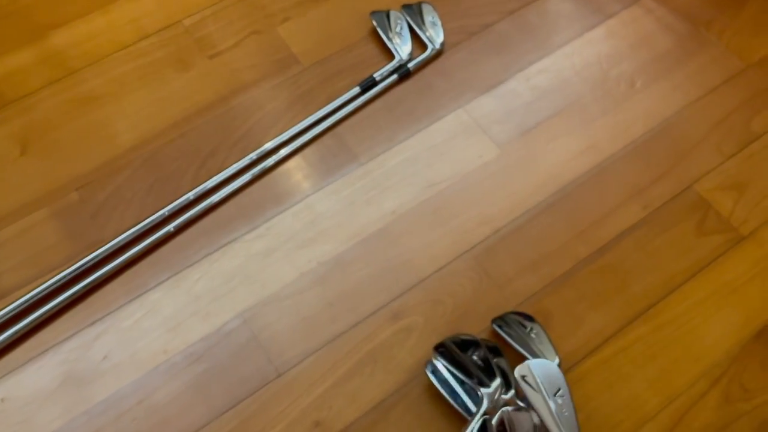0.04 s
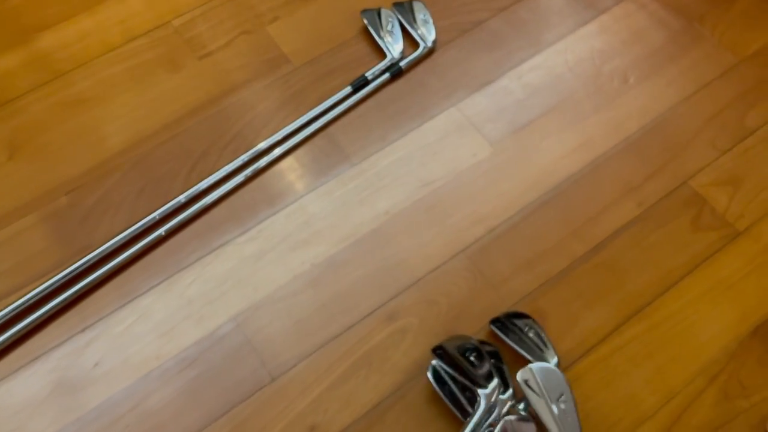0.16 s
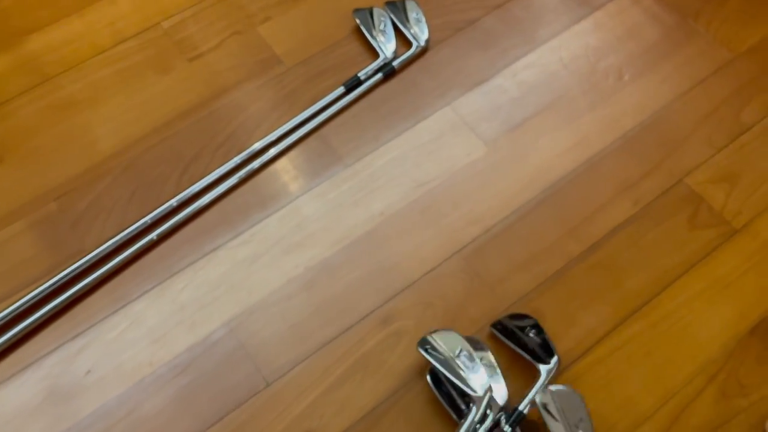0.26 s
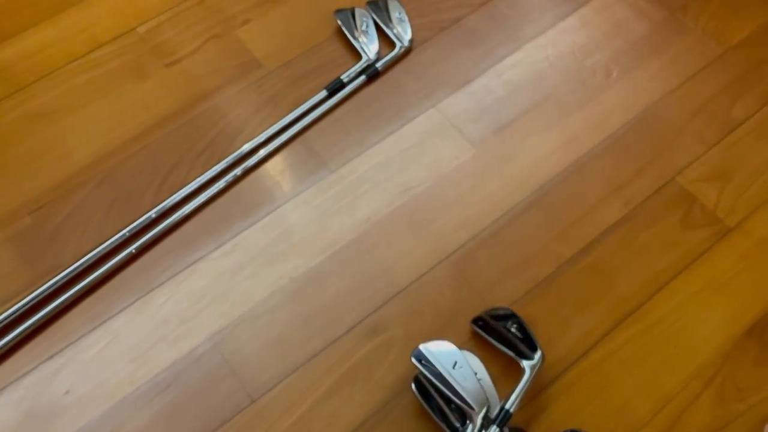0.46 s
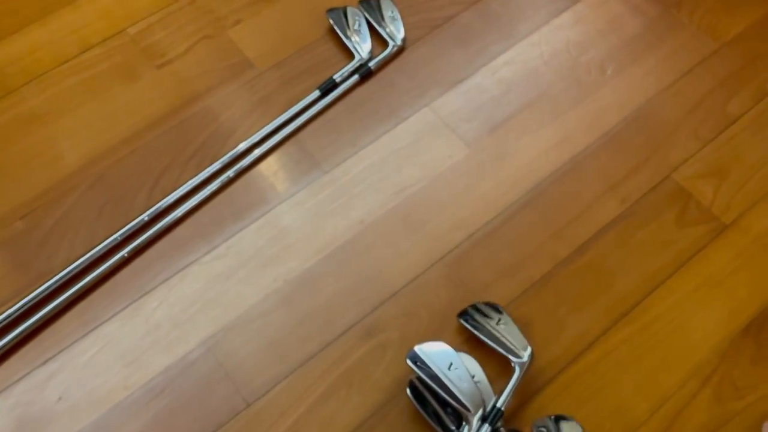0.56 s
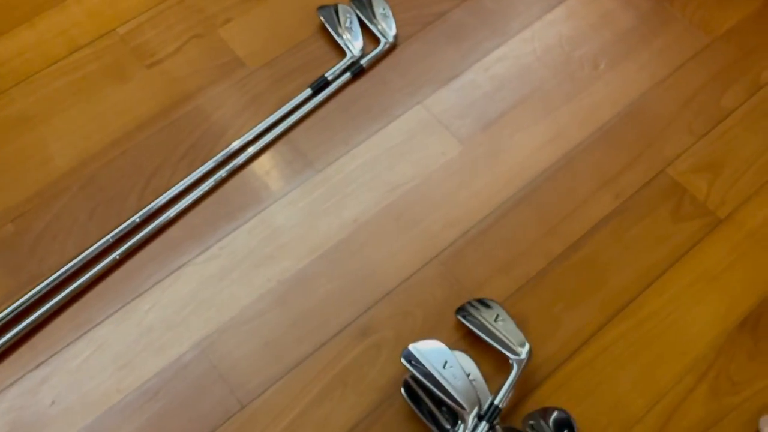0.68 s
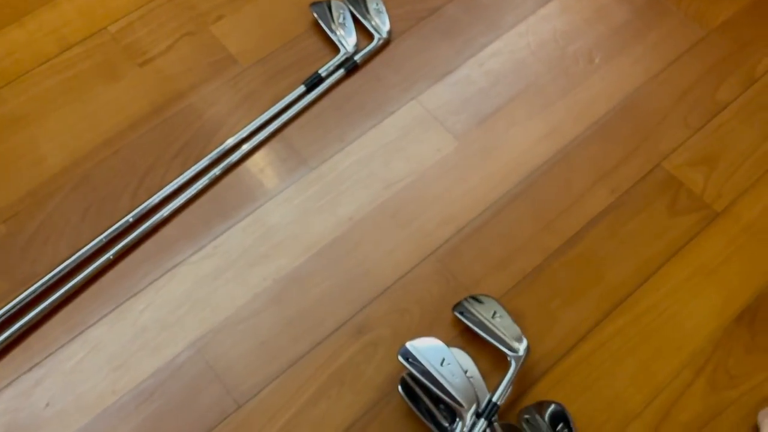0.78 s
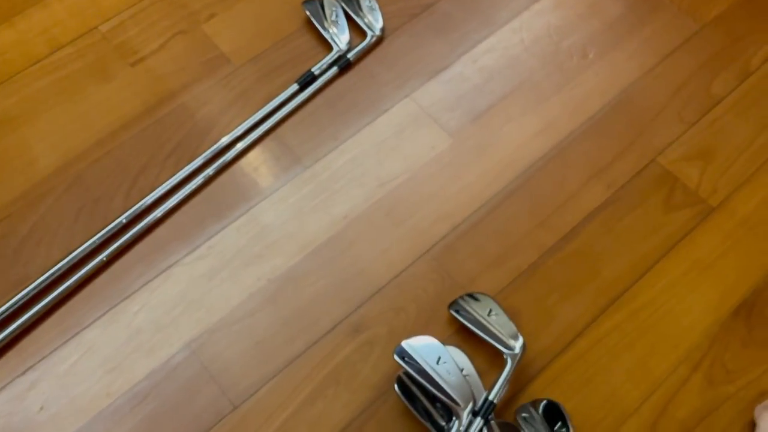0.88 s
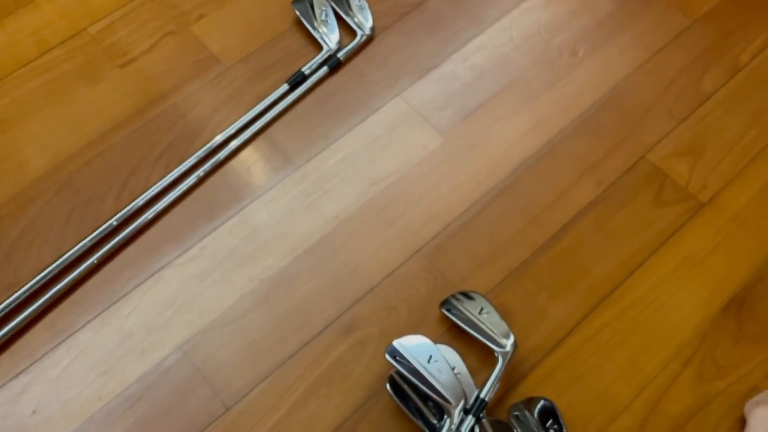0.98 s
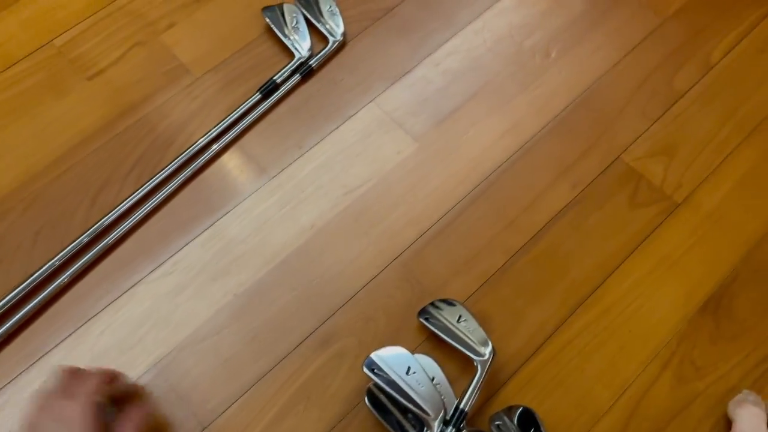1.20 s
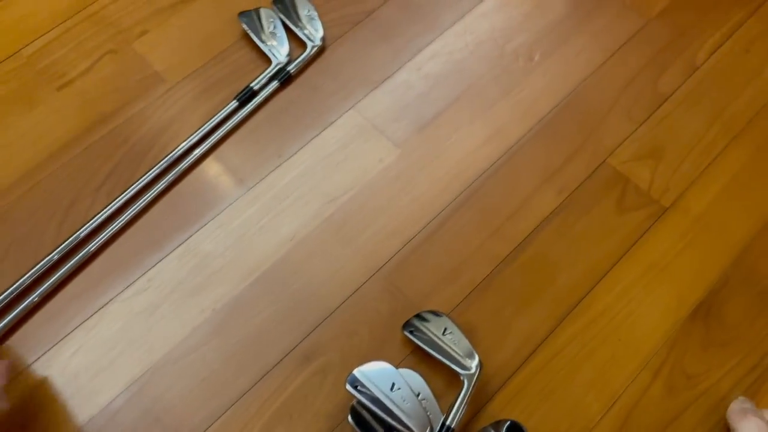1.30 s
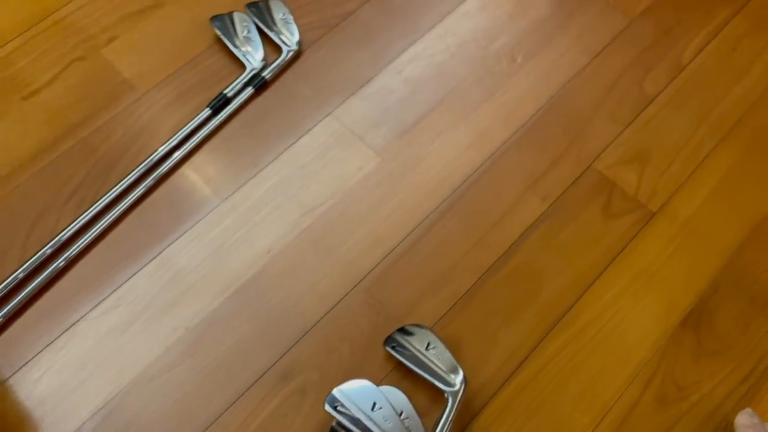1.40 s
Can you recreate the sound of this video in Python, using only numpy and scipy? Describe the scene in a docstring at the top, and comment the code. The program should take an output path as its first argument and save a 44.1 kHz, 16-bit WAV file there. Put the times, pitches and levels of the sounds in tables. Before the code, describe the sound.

A bundle of golf irons is set down hard: bright metal clacks, rattling shafts and hollow board knocks in a quick burst, echoing indoors, followed by sparse quiet clicks and dull handling bumps close to the microphone.

```python
"""An earlier blow still rings in a bare room, with faint hiss and low rumble; then light steel touches.
At 0.2-0.4 s a bundle of steel golf irons lands on a wooden floor: heads clack, boards knock, shafts rattle.
Blows excite decaying modes; tails of noise make the room. From 0.5 s come smaller ticks and knocks, and
soft low bumps at the hand-held microphone. Rumble and hiss are coloured noise under level curves.
Two microphone ports give left and right."""
import sys
import numpy as np
from scipy import signal
from scipy.fft import rfft, irfft
from scipy.io import wavfile

SR = 44100
rng = np.random.default_rng(int(sys.argv[2]) if len(sys.argv) > 2 else 0)


def put_to_file(sound):
    """Save the sound as 16-bit audio at rate SR, in the file named by the first command-line argument."""
    columns = np.atleast_2d(sound).T  # one column per channel
    safe = np.clip(columns, -1, 1)
    whole_steps = np.round(safe * 32767)
    wavfile.write(sys.argv[1], SR, whole_steps.astype(np.int16))


N = 63945
LEAD = 8192   # samples run before time zero


def amp(db):
    """Amplitude from dB."""
    return 10 ** (np.asarray(db) / 20)


def rms_one(x):
    """Scale to rms 1 over all channels together."""
    return x / np.sqrt(np.mean(x ** 2) + 1e-20)


def seconds():
    """Time of every sample, lead included."""
    return (np.arange(N + LEAD) - LEAD) / SR


def in_time(rows):
    """A level curve in dB as a gain per sample."""
    s, db = np.transpose(rows)
    return amp(np.interp(seconds(), s, db, left=db[0], right=db[-1]))


def at_hz(points, hz):
    """Read a curve along a logarithmic frequency axis."""
    points = np.array(points)
    return np.interp(np.log(hz + 1), np.log(points[:, 0] + 1), points[:, 1])


def coloured(points, count):
    """Steady noise of a given spectrum, rms 1, in unrelated channels."""
    spectrum = rfft(rng.standard_normal((count, N + LEAD)))
    hz = np.linspace(0, SR / 2, spectrum.shape[1])
    return rms_one(irfft(spectrum * amp(at_hz(points, hz)), N + LEAD))


def hiss():
    """Faint broadband noise under a level curve: shared and own parts."""
    # hiss level: t/s, level/dB before the lift
    level = [(0.0, -73), (0.258, -93), (0.382, -66), (0.46, -67), (0.638, -73.5), (0.73, -104.5),
             (0.98, -77), (1.138, -73.5), (1.45, -77)]
    # hiss spectrum: f/Hz, relative density/dB
    colour = [(40, -1.5), (120, 11), (350, 12), (600, -1.5), (1200, 5.5), (2200, 0.5), (4000, -2),
              (7000, -2.5), (9500, 1.5), (13500, -2.5), (15200, -3), (16500, -37.5)]
    lift_db = 16
    return amp(lift_db) * in_time(level) * coloured(colour, count=2)


def rumble():
    """Low noise of lumpy level at the hand-held microphone: shared and own parts."""
    # rumble level: t/s, level/dB
    level = [(0, -45.5), (.1, -49), (.2, -69), (.29, -44.5), (.37, -45), (.45, -56), (.62, -51.5),
             (.7, -44), (.8, -37.5), (.91, -46), (.97, -36.5), (1.1, -51), (1.24, -31), (1.28, -72),
             (1.45, -59)]
    # rumble spectrum: f/Hz, relative level/dB
    colour = [(15, -43), (35, -14.5), (65, -0.5), (110, -5.5), (170, -17), (260, -27.5), (500, -55.5),
              (1000, -76)]
    return in_time(level) * coloured(colour, count=2)


def bumps():
    """Soft low lumps felt by the microphone: a few cycles that swell quickly and fade."""
    # bumps: t/s, envelope peak/dB, f/Hz
    bump_rows = [(0.521, -37, 123), (0.573, -40, 50), (0.666, -46, 48.4), (0.705, -28.5, 157),
                 (0.715, -28, 105), (0.749, -25, 81.7), (0.765, -26.5, 75.4), (0.785, -19.5, 113),
                 (0.829, -27, 59.2), (0.866, -30.5, 87.4), (0.888, -37.5, 62.7), (0.926, -28.5, 114),
                 (0.942, -26, 92), (0.979, -30.5, 136), (0.995, -37, 61), (1.032, -28.5, 60.3),
                 (1.08, -31, 145), (1.109, -42, 51.1), (1.144, -49, 72.7), (1.179, -60, 67.3),
                 (1.206, -35.5, 74), (1.228, -46, 60)]
    length_cycles = 2.16
    out, t = 0, seconds()
    for s, db, hz in bump_rows:
        done = np.clip((t - s) * hz / length_cycles, 0, 1)
        swell = np.sin(np.pi * done ** 0.62) ** 2
        out = out + amp(db) * swell * np.sin(2 * np.pi * hz * (t - s))
    return out


def room(x):
    """Two unrelated tails of noise that die band by band, each with a quicker early part."""
    # reverberation time: f/Hz, t60/s
    room_t60 = [(100, 0.7), (300, 1.3), (1000, 1.005), (3000, 0.62), (6000, 0.9), (12000, .5)]
    # late tail: f/Hz, relative level/dB
    room_colour = [(100, -2.5), (300, -11), (1000, -14), (2000, -9.5), (3500, -11.5), (7000, -19),
                   (12000, -33)]
    early_t60_s, early_db, onset_s = 0.18, -7, 0.0037
    t = np.arange(SR) / SR
    edges_hz = 70 * 2 ** np.arange(0, 8.1, .5)
    tails, white = 0, rng.standard_normal((2, 2, SR))
    for k, (low, high) in enumerate(zip(edges_hz, edges_hz[1:])):
        hz = np.sqrt(low * high)
        sos = signal.butter(2, [low, high], "band", fs=SR, output="sos")
        band = signal.sosfilt(sos, white[k % 2])   # adjacent bands use different noise
        t60 = at_hz(room_t60, hz)
        late = amp(at_hz(room_colour, hz) - 60 * t / t60) / np.sqrt(t60)
        early = amp(early_db - 60 * t / early_t60_s) / np.sqrt(early_t60_s)
        energy_scale = np.sqrt(6 * np.log(10) / SR)
        tails = tails + band * (late + early) * energy_scale * np.minimum(t / onset_s, 1)
    return signal.fftconvolve(x[None], tails, axes=1)[:, :len(x)]


def ports(shared, own):
    """Two microphone ports: level and phase differ between them with frequency."""
    # gain of room and hiss that the ports do not share: f/Hz, level/dB
    unlike = [(100, -23), (350, -11), (650, 7), (1200, -4), (3000, -3.5), (5500, -3.5), (7500, -12.5),
              (9000, -21), (12000, -8.5), (13500, -34.5)]
    # level difference: f/Hz, left minus right/dB
    balance = [(60, -3), (200, 5), (400, 3.5), (700, 10.5), (1200, 5.5), (2400, 6.5), (4400, 4.5),
               (8100, 3), (9000, -0.5), (15000, 1.5)]
    # phase difference: f/Hz, left lead/rad
    phase = [(0, 0), (170, .5), (520, .6), (700, -1.9), (1050, -.8), (2050, 0), (3300, .9), (5200, .5),
             (6000, -1.3), (8600, -np.pi), (13000, -2 * np.pi)]
    shared, own = rfft(shared), rfft(own)
    hz = np.linspace(0, SR / 2, len(own))
    own = own * amp(at_hz(unlike, hz))
    louder = amp(at_hz(balance, hz) / 2)   # half up on the left, half down on the right
    turn = np.exp(1j * np.interp(hz, *np.transpose(phase)))
    left = (shared + own) * louder * turn
    right = (shared - own) / louder
    return irfft([left, right], N + LEAD)


def strike(modes, s, db, favoured_hz=None):
    """Decaying resonators: every blow rings every mode with a strength of its own."""
    spread_db, favour_db_per_octave = 3, 18   # modes fall off away from the favoured pitch
    out = np.zeros(N + LEAD)
    at = np.clip((np.asarray(s) * SR).astype(int) + LEAD, 0, N + LEAD - 1)
    luck = rng.standard_normal((len(at), len(modes)))
    for k, (hz, level_db, t60) in enumerate(modes):
        away_db = 0
        if favoured_hz is not None:
            away_db = favour_db_per_octave * np.abs(np.log2(hz / favoured_hz))
        click_db = db + level_db - away_db + spread_db * luck[:, k]
        clicks = np.full(N + LEAD, 1e-18)
        np.add.at(clicks, at, amp(click_db) * (-1) ** k)   # signs alternate by mode
        r, w = amp(-60 / (t60 * SR)), 2 * np.pi * hz / SR
        out += signal.lfilter([0, np.sin(w)], [1, -2 * r * np.cos(w), r * r], clicks)
    return out / np.sqrt(len(modes))


def rattle():
    """Shafts rattle as the bundle settles: uneven steel touches, every third also on wood."""
    # rattle: t/s, base level/dB
    level = [(.19, -52), (.23, -38.5), (.25, -27.5), (.268, -36.5), (.28, -26.5), (.35, -29.5),
             (.375, -37.5), (.42, -50.5)]
    touches_per_s, steel_db, board_db = 620, -5, -4
    start, end = level[0][0], level[-1][0]
    draws = rng.random((150, 3))
    s = start + np.cumsum(-np.log(1 - draws[:, 0])) / touches_per_s
    db = np.interp(s, *np.transpose(level))
    db = db - 200 * (s > end)   # silent past the end
    db = db - 3.45 * np.log(1 - draws[:, 1])
    flat, pitch = np.zeros(len(s)), 2 ** draws[:, 2]
    metal = steel(s, db + steel_db, flat - 4, flat - 9, 2700 * pitch)
    wood = boards(s[::3], db[::3] + board_db, flat[::3] - 2.5, 1000 * pitch[::3])
    return metal + wood


def boards(s, db, high_db, hz):
    """Knocks ring low and high modes of the wooden floor; the high ones favour a pitch."""
    # low, high board modes: f/Hz, relative level/dB, t60/s
    low_modes = [(118.8, -10.5, 0.039), (176.5, -11, 0.07), (243, -9, 0.078), (306.6, -0.5, 0.078),
                 (333, -1, 0.067), (403.4, -1.5, 0.047), (466.5, -8.5, 0.067), (507.3, -6.5, 0.054),
                 (610.5, -8, 0.019)]
    high_modes = [(760, 3, 0.01), (958, 1.5, 0.029), (1025, 1, 0.023), (1102, 2, 0.033), (1380, 4.5, 0.013),
                  (1579, 0.5, 0.026), (1770, -0.5, 0.031), (1940, 1, 0.029), (2244, 7.5, .012)]
    return strike(low_modes, s, db + 2.5) + strike(high_modes, s, db + high_db + 4.5, hz)


def steel(s, db, mid_db, top_db, hz):
    """Each touch is three quick contacts into the head's modes; the low ones favour a pitch."""
    # low, mid, top head modes: f/Hz, relative level/dB, t60/s
    low_modes = [(2550, 3, 0.011), (2844, 2.5, 0.0081), (3475, -1, 0.014), (3850, -3, 0.014),
                 (4494, 4.5, 0.0052), (5210, 1, 0.0088), (6000, -0.5, 0.0035)]
    mid_modes = [(6430, 1, .004), (7340, 4, 0.0075), (7740, 2, 0.0058), (7800, 0.5, 0.0063),
                 (9120, -5, .004)]
    top_modes = [(10160, 1, 0.0027), (10700, 1.5, .005), (11450, 4.5, 0.0043), (12800, -2.5, 0.0041),
                 (13900, -0.5, .004), (15100, -21.5, .004)]
    chatter_s = .002   # contacts fall within this
    late = np.sort(rng.random((len(s), 3)), axis=1) * chatter_s * [0, 1, 1]
    s = (s[:, None] + late).ravel()
    db = (db[:, None] - [1, 3, 5]).ravel()
    low = strike(low_modes, s, db, np.repeat(hz, 3))
    mid = strike(mid_modes, s, db + np.repeat(mid_db, 3))
    top = strike(top_modes, s, db + np.repeat(top_db, 3))
    return low + mid + top


def scene():
    """Clubs and their room plus hiss pass the ports; bumps and rumble are added after."""
    # steel heads touch: t/s, nominal low-mode level/dB, mid and top relative to it/dB, favoured f/Hz
    clack_rows = [(0.0014, -25, -25, -21, 2790), (0.026, -30, -24, -24, 5130),
                  (0.171, -32.5, -33, -22, 4440), (0.2024, -32, -28, -9, 5100),
                  (0.2104, -29.5, -22, -13, 3250), (0.2349, -22.5, -15, -8, 4260),
                  (0.2434, -25.5, -25, -3, 3290), (0.2498, -13.5, -16, -19, 4660),
                  (0.2728, -5, 1, -10, 4460), (0.2774, -3.5, -6, -7, 3760), (0.2914, -11, -4, -17, 3610),
                  (0.3022, -8, -12, -14, 4070), (0.3174, -16.5, 5, -9, 4390), (0.3274, -7, -7, -15, 4020),
                  (0.3404, -22, -8, -6, 3560), (0.3469, -9, -2, -8, 3990), (0.3661, -3.5, -4, 0, 4820),
                  (0.376, -43, -21, -28.5, 3740), (0.3844, -10, -25, -26.5, 3570),
                  (0.5641, -24.5, 1, -5.5, 3540), (0.569, -31, 6, -21, 3870),
                  (0.575, -28.5, -10, -20, 3580), (0.5804, -38.5, -14.5, -33.5, 3520),
                  (0.594, -29.5, -19, -13.5, 3630), (0.7003, -49.5, -9, -12, 3565),
                  (0.7317, -23, -21, -25, 3570), (0.9502, -39.5, -32, -16.5, 3180),
                  (0.9624, -49, -24, -16.5, 2800), (1.271, -45, -27, -1, 2500),
                  (0.7612, -38, -28, -30, 3150), (1.0874, -34, -11, -8, 4420)]
    # boards are knocked: t/s, nominal low-mode level/dB, high relative to it/dB, favoured high f/Hz
    knock_rows = [(0.002, -23.5, -5, 1230), (0.029, -36, -10, 1120), (0.071, -36.5, -28, 1300),
                  (0.147, -48, 4, 1540), (0.175, -26.5, -11.5, 751), (0.203, -28, -3.5, 1150),
                  (0.218, -19, -12.5, 1330), (0.23, -9.5, -4.5, 1093), (0.241, -21.5, -4, 1190),
                  (0.25, -11.5, -9, 1260), (0.273, -12, -2.5, 1580), (0.288, -5.5, -4.5, 1500),
                  (0.307, -11.5, -3, 1050), (0.324, -16, 5, 1060), (0.328, -4.5, -7, 1510),
                  (0.342, -17.5, 8.5, 1386), (0.356, -3.5, 1, 1000), (0.367, -37.5, 2.5, 1080),
                  (0.396, -31, 5, 1120), (0.449, -33.5, 9, 1100), (0.517, -26.5, -1.5, 1110),
                  (0.564, -26.5, -6, 1630), (0.571, -30, 6, 1100), (0.612, -23, -12, 1060),
                  (0.728, -22, -11.5, 1150), (0.73, -32, 1.5, 1390), (0.76, -31.5, 0.5, 1350),
                  (0.818, -37, -12, 886), (0.859, -37.5, -26.5, 883), (0.964, -46.5, 2, 1060),
                  (1.09, -35, -6, 1140), (1.168, -45.5, -27.5, 1020), (1.272, -58.5, 13, 905),
                  (1.316, -56.5, 6.5, 1000), (1.364, -49, -1, 945), (1.403, -53, -25, 950),
                  (1.442, -41.5, -14, 993), (0.951, -54, 11, 1940), (1.083, -48.5, 4.5, 2200)]
    earlier_s = -0.046   # a set-down just before, still ringing
    low_cut_hz, rumble_unlike = 86, 0.67
    near_from_s, near_room_db = .69, -9   # later ticks are close by and excite the room less
    clacks = np.vstack([(earlier_s, -7.5, -5, -10, 4200), clack_rows])
    knocks = np.vstack([(earlier_s, -13, -3, 1200), knock_rows])

    clubs = steel(*clacks.T) + boards(*knocks.T) + rattle()
    clubs = signal.sosfilt(signal.butter(3, low_cut_hz, "high", fs=SR, output="sos"), clubs)
    room_send = in_time([(near_from_s, 0), (near_from_s + .03, near_room_db)])
    room_shared, room_own = room(clubs * room_send)
    hiss_shared, hiss_own = hiss()
    rumble_shared, rumble_own = rumble()
    air = ports(clubs + room_shared + hiss_shared, room_own + hiss_own)
    rumble_pair = rumble_shared + rumble_unlike * rumble_own * [[1], [-1]]
    return (air + bumps() + rumble_pair)[:, LEAD:]


def record(dry):
    """Peaks are rounded by tanh, then the top is cut."""
    rounded = 1.2 * np.tanh(dry / 1.2)
    stop_hz = 16700   # 90 dB down from here
    return signal.sosfilt(signal.cheby2(16, 90, stop_hz, fs=SR, output="sos"), rounded)


dry = scene()
out = record(dry)
put_to_file(out)
```